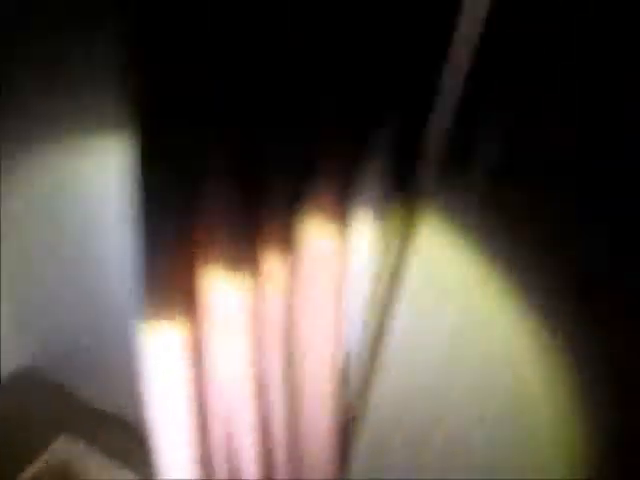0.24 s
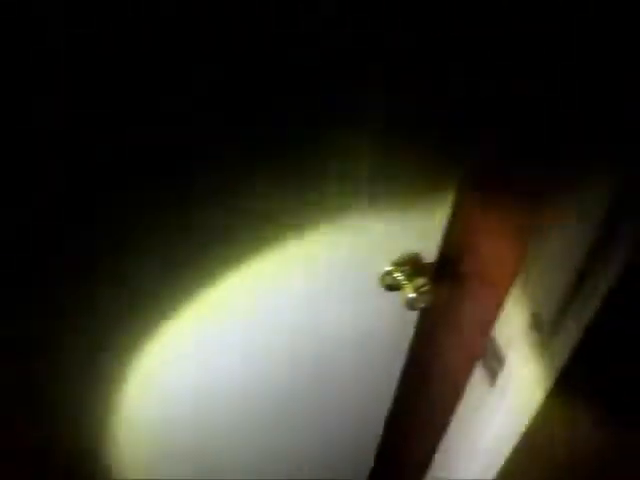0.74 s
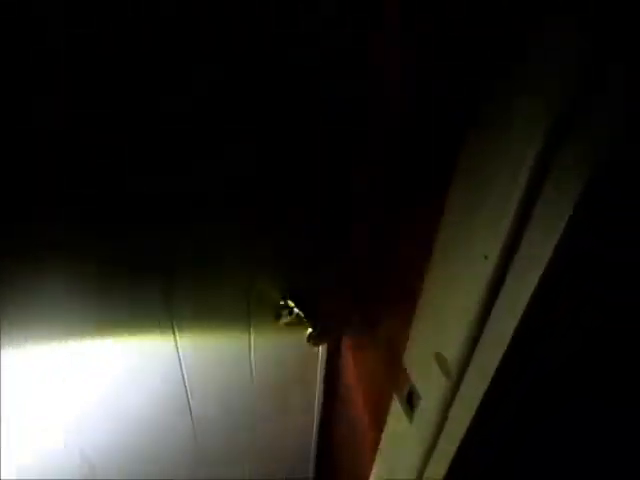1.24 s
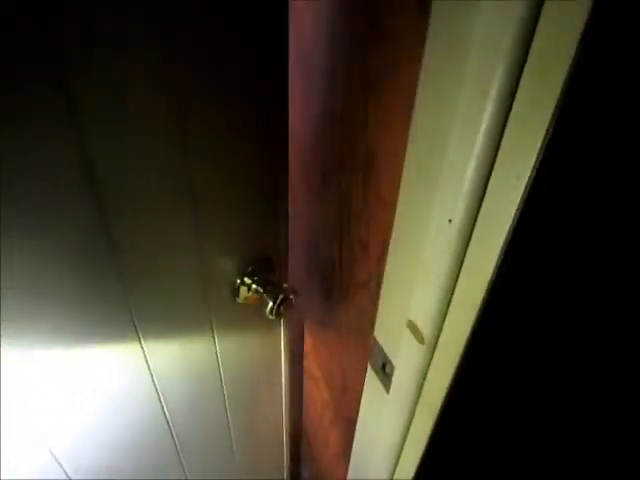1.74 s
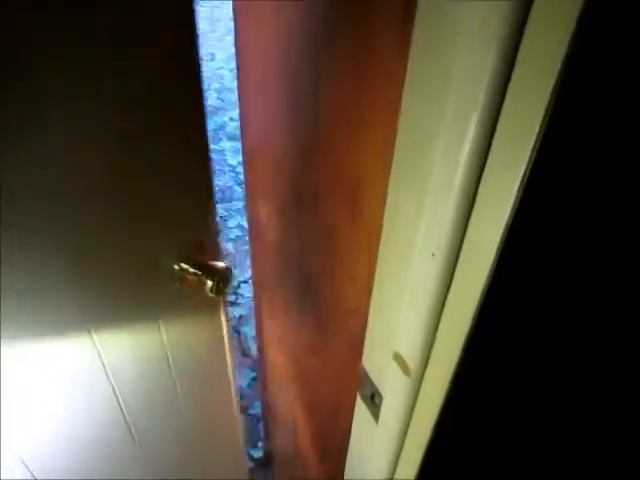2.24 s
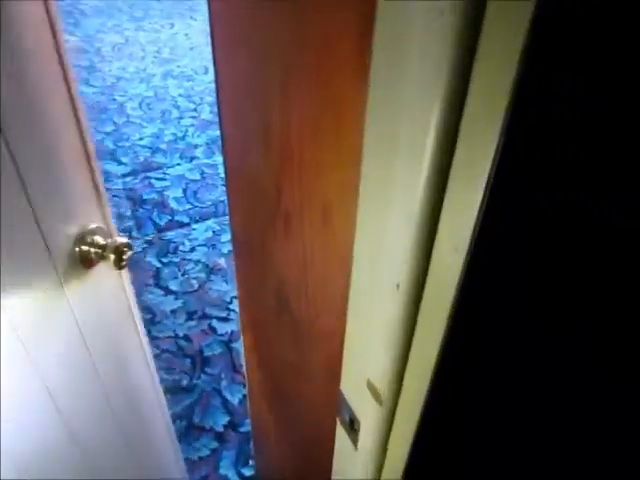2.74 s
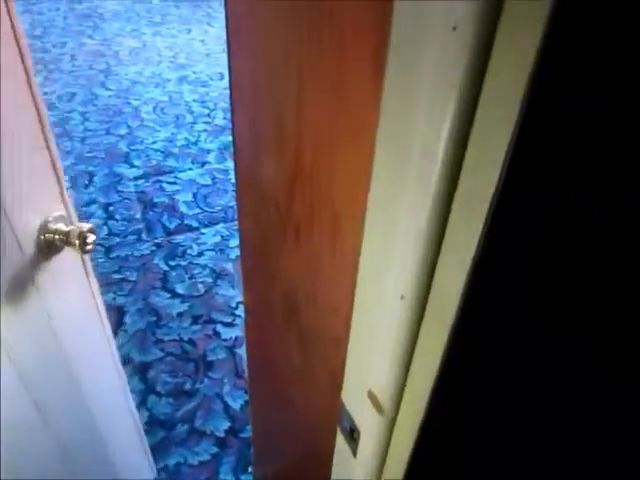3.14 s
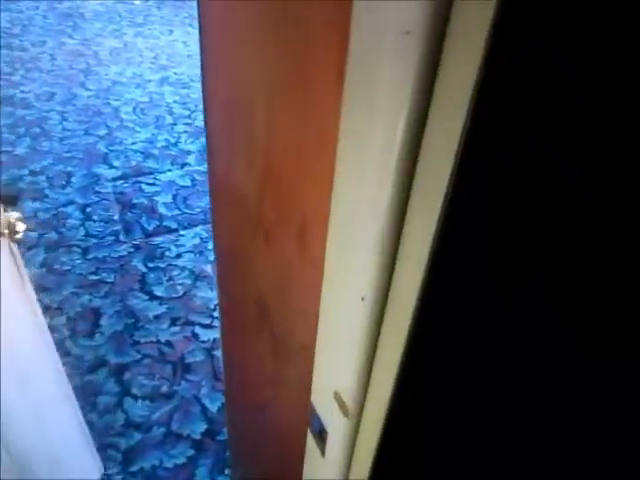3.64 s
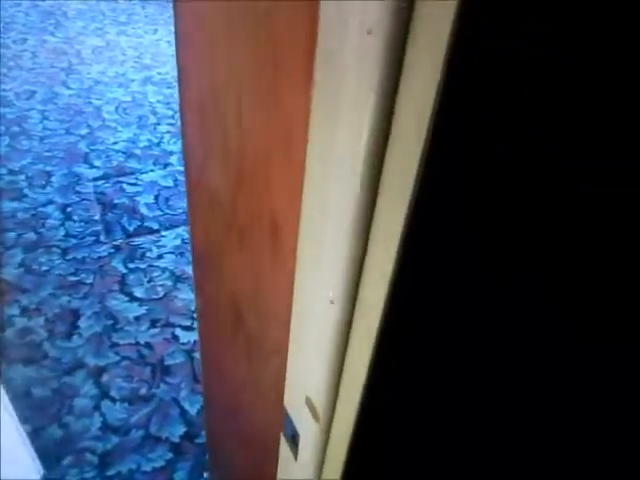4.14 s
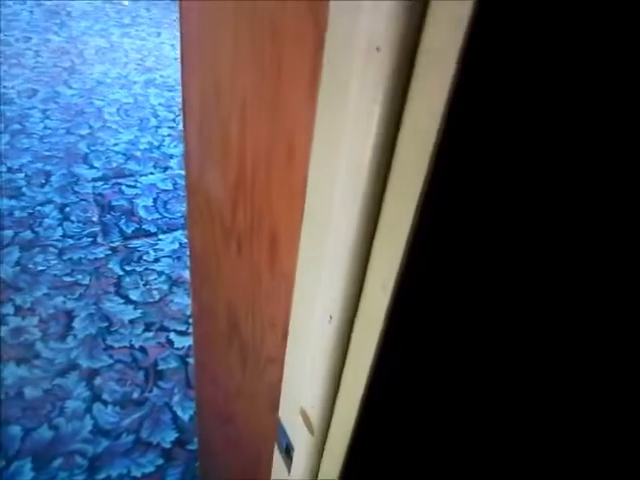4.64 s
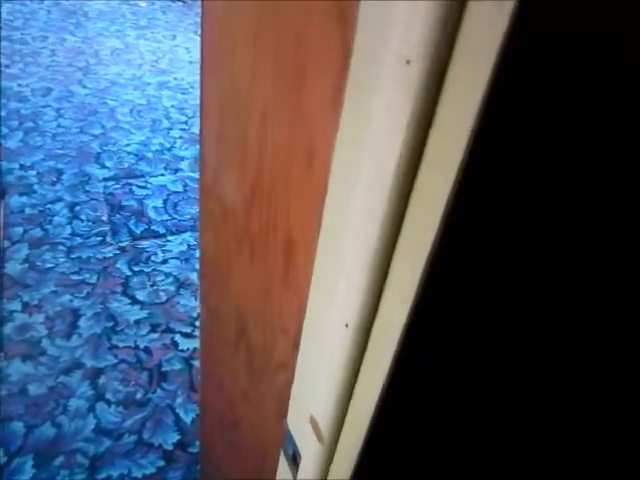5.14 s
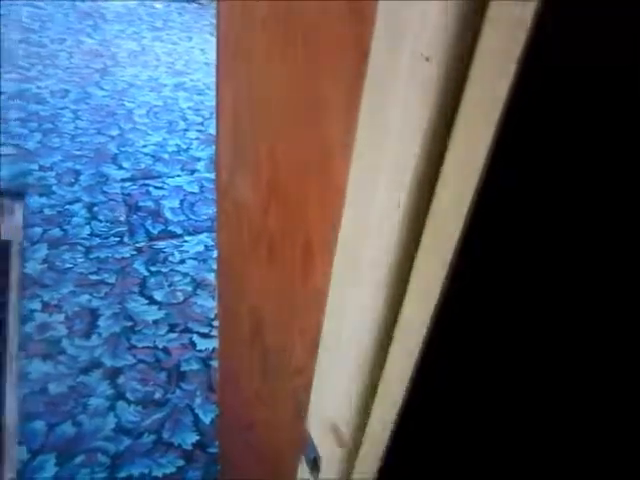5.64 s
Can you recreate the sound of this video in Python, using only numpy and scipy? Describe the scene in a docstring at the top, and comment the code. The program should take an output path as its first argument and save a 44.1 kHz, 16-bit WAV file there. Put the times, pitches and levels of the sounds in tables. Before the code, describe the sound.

Close, slightly hissy handheld sound indoors: carpet drag and cloth rustle first, then dull footfalls with gritty scuffs and board clicks. The middle is calmer, with faint dragging and a deep hum gradually rising. One hollow door knock comes past the middle, then light thuds and sharp ticks, and finally a much louder woody bang with latch clack, short room echo and bumps on the camera.

```python
"""A faint hiss and the drag of a door over carpet open the scene, as someone with a camera pushes the door.
Shaped noise makes the hiss, the dragging, the rustling clothes, the bang's deep boom and hand rumble.
Fading tones and noise bursts make the thudding feet and the small clicks; gritty noise makes the scuffs.
A hollow wooden knock and then a hard bang ring through the room, as quick contacts excite the wood.
A low drone grows meanwhile, and the camera's gain control turns down loud peaks."""
import sys
import numpy as np
from scipy import signal
from scipy.fft import rfft, irfft, next_fast_len
from scipy.io import wavfile
from scipy.ndimage import uniform_filter1d, minimum_filter1d, map_coordinates

SR = 44100
rng = np.random.default_rng(int(sys.argv[2]) if len(sys.argv) > 2 else 0)


def wrap_up_sound(samples):
    """Save the sound to the file named by the first command line argument, as 16-bit audio."""
    columns = np.atleast_2d(samples).T
    # keep every value between -1 and 1, then stretch to whole-number steps
    tamed = np.clip(columns, -1, 1)
    steps = np.round(tamed * 32767).astype(np.int16)
    wavfile.write(sys.argv[1], SR, steps)


N = 259749  # length in samples


def amp(db):
    """Turn decibels into a gain."""
    return 10 ** (np.asarray(db) / 20)


def unit(x):
    """Scale a signal to an average (rms) level of 1."""
    return x / np.sqrt(np.mean(x ** 2) + 1e-20)


def along(points, hz):
    """Read a curve of (Hz, value) points on a logarithmic frequency axis."""
    point_hz, values = np.transpose(points)
    return np.interp(np.log(hz + 1), np.log(point_hz + 1), values)


def wobble(rate):
    """A smooth random curve through `rate` random points a second."""
    points = rng.standard_normal(int(N * rate / SR) + 4)
    return map_coordinates(points, [np.arange(N) * rate / SR])


def colour(x, gain):
    """Filter a sound by a gain that depends on frequency, with no echo ahead of the sound."""
    m = 2 * next_fast_len(len(x))
    wanted = np.maximum(gain(np.fft.rfftfreq(m, 1 / SR)), 1e-6)
    # folding the cepstrum (the spectrum of the log gain) makes the filter act only forward in time
    cepstrum = irfft(np.log(wanted))
    cepstrum[1:m // 2] *= 2
    cepstrum[m // 2 + 1:] = 0
    return irfft(rfft(x, m) * np.exp(rfft(cepstrum)))[:len(x)]


def noise(spectrum):
    """Steady noise of rms 1, shaped by (Hz, dB) points."""
    m = next_fast_len(N)
    gain = amp(along(spectrum, np.fft.rfftfreq(m, 1 / SR)))
    return unit(irfft(rfft(rng.standard_normal(m)) * gain, m)[:N])


def fade(t, t60):
    """Exponential decay that loses 60 dB in t60 seconds."""
    return np.exp(-np.log(1000) * t / t60)


def stroke(start, length, rise, t60):
    """Loudness curve that builds up, holds, then dies away."""
    t = np.arange(N) / SR - start
    return np.clip(t / rise, 0, 1) * fade(np.maximum(t - length, 0), t60)


def swells(rows):
    """Loudness curve of smooth movements, from rows of (peak s, dB, half-length s)."""
    t = np.arange(N) / SR
    return np.sqrt(sum(np.square(amp(db) * np.exp(-np.square((t - s) / half))) for s, db, half in rows))


def add(track, s, sound):
    """Mix a sound into the track from s seconds on."""
    part = track[round(s * SR):][:len(sound)]
    part += sound[:len(part)]


def in_room(x, wet_db):
    """Add the answer of the walls: fading noise in which each pitch range has its own decay."""
    # Each row: frequency in Hz, strength of the room's answer in dB.
    walls = [(100, 0), (400, 2), (1200, -5), (3000, -3.5), (5000, -6.5), (8000, -6), (14000, 6.5)]
    # Each row: frequency in Hz, time to fade by 60 dB in seconds.
    decays = [(80, 0.53), (350, 0.37), (1000, 0.46), (2000, 0.38), (4000, 0.37), (7000, 0.34),
              (14000, 0.12)]
    hz, t, z = signal.stft(rng.standard_normal(len(x)), SR, nperseg=256)
    z = z * amp(along(walls, hz))[:, None] * fade(t, along(decays, hz)[:, None])
    tail = signal.istft(z, SR, nperseg=256)[1]
    tail = np.pad(tail / np.linalg.norm(tail), (round(.005 * SR), 0))  # the answer starts 5 ms late
    return x + amp(wet_db) * signal.fftconvolve(x, tail)[:len(x)]


def background():
    """Room tone and hiss, faint whines, and the next room's drone that grows as the door opens."""
    # Shape of the room tone and hiss. Each row: frequency in Hz, relative level in dB.
    floor = [(15, -54), (25, -2), (64, -7.5), (102, -4.5), (148, -15.5), (174, -10), (276, -12),
             (414, -17.5), (834, -19.5), (929, -20.5), (1220, -20.5), (2090, -24.5), (2520, -26.5),
             (9460, -32), (15800, -41)]
    # Tones of the drone. Each row: pitch in Hz, relative level in dB.
    hum = [(97, -68), (119, -65)]
    # Faint whines in the microphone hiss. Each row: centre in Hz, level in dB.
    whines = [(7950, -81), (9550, -77.5), (13050, -83)]
    whine_width_hz = 140
    drone_shut_db, drone_open_db, door_open_s = -11.5, 9.5, 4.0
    t = np.arange(N) / SR
    drone = 0
    for hz, db in hum:
        level = amp(db + 4.4 * wobble(3.046))  # loudness and phase both waver
        drone = drone + level * np.sin(2 * np.pi * hz * t + 0.45 * wobble(26))
    drone_db = np.interp(t, [0, door_open_s], [drone_shut_db, drone_open_db])
    whine = 0
    for hz, db in whines:
        whine = whine + amp(db) * unit(wobble(2 * whine_width_hz) * np.sin(2 * np.pi * hz * t))
    return amp(-53) * noise(floor) + amp(drone_db) * drone + whine


def drag(rough_db):
    """With each push the carpet pile catches unevenly on the door's edge and the hollow leaf hums."""
    # Each row: start in seconds, length in seconds, level in dB, time to coast down by 60 dB in seconds.
    pushes = [(-.04, 0.083, -45.5, 1.5), (0.512, 0.55, -45, 0.44), (1.197, 0.4, -54, 1.4),
              (1.633, 0.14, -52, 2), (2.357, 0.35, -49.5, 2.4), (3.317, 0.49, -59, 3.7),
              (4.435, 0.17, -49, 5.1), (5.317, .36, -47.5, 2.4)]
    # Shape of the rubbing sound. Each row: frequency in Hz, relative level in dB.
    rub = [(60, -24), (200, -34), (290, -10), (345, 2), (390, 1), (450, -5), (540, -10.5), (700, -17),
           (1000, -13.5), (1200, -21.5), (1450, -18.5), (1800, -21.5), (2250, -21.5), (3000, -31),
           (8000, -43), (16000, -66)]
    push_rise_s = 0.038  # time for the door to get moving
    speed = np.max([amp(db) * stroke(s, length, push_rise_s, t60) for s, length, db, t60 in pushes], axis=0)
    return speed * unit(noise(rub) * amp(rough_db * wobble(70)))


def clothes(grain_db):
    """Cloth rustles and a sleeve swishes: noise with a fine grain that swells with each movement."""
    # Body movements. Each row: time of the peak in seconds, level in dB, half-length in seconds.
    rustles = [(.03, -56.5, 0.31), (.83, -53.5, 0.53), (1.3, -61, 0.062), (1.54, -54, 0.15),
               (1.76, -54, 0.099), (2.63, -60, 0.1), (5.65, -63, 0.074)]
    # Airy sleeve movements. Each row: time of the peak in seconds, level in dB, half-length in seconds.
    swishes = [(1.027, -60, 0.19), (1.463, -48, 0.02), (1.565, -53, 0.037), (2.618, -70, .05),
               (3.078, -62.5, .06), (4.635, -55.5, 0.033)]
    # Shape of the rustle. Each row: frequency in Hz, relative level in dB.
    cloth = [(200, 9.5), (1000, -12), (3000, 1), (6000, 0.5), (11000, -4), (14000, -9), (16000, -26)]
    airy = [(500, -9), (3000, -12), (7000, -1), (12000, 1), (14500, -8), (16000, -7)]  # (Hz, dB)
    grain = amp(grain_db * wobble(250))
    rustling = swells(rustles) * unit(noise(cloth) * grain)
    swishing = swells(swishes) * unit(noise(airy) * grain)
    return rustling + swishing


def clicks(sharpness, wet_db):
    """Boards and fittings click: small hard contacts, each a noise burst in one broad resonance."""
    # Each row: start in seconds, level in dB, centre in Hz, time to fade by 60 dB in seconds.
    contacts = [(.149, -52, 4500, 0.043), (.5335, -40, 2400, 0.02), (.746, -43.5, 7400, 0.04),
                (1.3095, -42.5, 1540, 0.052), (1.317, -46.5, 6000, 0.036), (1.7235, -36, 1620, 0.1),
                (1.7275, -32.5, 4280, 0.031), (2.66, -54, 5000, .04), (2.943, -52, 1360, .04),
                (4.2395, -50, 4430, .04), (4.3585, -44.5, 1370, 0.068), (4.359, -50.5, 5400, .04),
                (4.5195, -30.5, 2380, 0.02), (4.5225, -30.5, 3840, 0.016), (5.175, -38, 7000, 0.069),
                (5.203, -44, 7500, 0.17), (5.457, -52, 2770, 0.052), (5.507, -56, 2800, .05),
                (5.652, -43.5, 3420, 0.062)]
    t, out = np.arange(SR // 2) / SR, np.zeros(N)
    for s, db, hz, t60 in contacts:
        def band(f):
            detune = sharpness * (f / hz - hz / (f + 1))
            return 1 / (1 + detune ** 4) + 0.025

        # drop the first samples, where the filter is still filling up
        burst = unit(colour(rng.standard_normal(len(t) + 512), band))[512:]
        add(out, s, in_room(amp(db) * burst * fade(t, t60), wet_db))
    return out


def footsteps(tread_db, wet_db):
    """A soft sole thuds and sets the floorboard under it swinging."""
    # Each row: start in seconds, level in dB, board pitch in Hz, time for the board to fade by 60 dB in seconds.
    steps = [(.578, -31, 227, 0.077), (1.3088, -26, 210, 0.097), (1.316, -33.5, 121.4, 0.26),
             (1.7234, -25, 200, 0.16), (2.943, -39, 280, 0.043), (4.359, -32, 347, 0.038),
             (4.368, -28.5, 400, 0.039), (4.3798, -33.5, 98, 0.6), (4.452, -30, 362, 0.065),
             (5.686, -35, 358, 0.064)]
    t, out = np.arange(SR // 2) / SR, np.zeros(N)
    sole = noise([(40, -19), (120, -3), (330, -3.5), (550, -12.5), (1000, -21.5), (3000, -41), (10000, -50)])
    onset = 1 - np.exp(-t / 0.00096)
    for s, db, hz, t60 in steps:
        board = np.sin(2 * np.pi * hz * t) * fade(t, t60)
        tread = amp(tread_db) * np.roll(sole, -round(s * SR))[:len(t)] * fade(t, 0.23)
        add(out, s, in_room(amp(db) * (board + tread) * onset, wet_db))
    return out


def scuffs(grain_db):
    """Soles and trouser legs slide in short strokes of gritty noise."""
    # Each row: time of the peak in seconds, level in dB, rise in seconds,
    # time to fade by 60 dB in seconds, boost of the body below about 1 kHz in dB.
    slides = [(1.215, -41, 0.007, 0.3, -17), (1.242, -39, 0.0071, 0.14, -14), (1.262, -46.5, .012, 0.24, 5),
              (1.441, -44.5, 0.0015, 0.16, 12.5), (1.484, -59, 0.019, 0.18, 26.5)]
    # Shape of the sliding hiss. Each row: frequency in Hz, relative level in dB.
    sole = [(150, -2), (550, 4.5), (900, 3), (1400, 3), (2200, 0), (4200, 1), (7000, -3.5), (11000, -7),
            (16000, -20)]
    t, out = np.arange(SR // 2) / SR - .05, np.zeros(N)  # time 0 is the peak
    hiss = unit(noise(sole) * amp(grain_db * wobble(350)))
    for s, db, rise, t60, body_db in slides:
        slide = np.exp(np.minimum(t, 0) / rise) * fade(np.maximum(t, 0), t60)
        grain = colour(hiss[round(s * SR):][:len(t)], lambda hz: amp(body_db / (1 + (hz / 1000) ** 2)))
        add(out, s + t[0], amp(db) * slide * grain)
    return out


def knock(blows, spectrum, modes, ring_db, chatter_db, chatter_t60, chatter_hz, wet_db):
    """Wood meets wood in a few quick contacts; the panel chatters briefly and its own tones ring on."""
    t, out = np.arange(SR // 2) / SR, np.zeros(N)
    for s, db, hard_hz in blows:
        # one clean push for the bass, a spray of tiny after-contacts for the treble
        spray = rng.standard_normal(len(t)) * fade(t, chatter_t60)
        push = amp(chatter_db) * colour(spray, lambda hz: hz / np.hypot(hz, chatter_hz))
        push[0] = 1
        # softer contacts give the wood less treble
        thud = colour(push, lambda hz: amp(along(spectrum, hz)) / np.hypot(1, (hz / hard_hz) ** 2))
        add(out, s, amp(db) * in_room(thud, wet_db))
    # the strongest contact sets the panel ringing
    s, db, _ = max(blows, key=lambda row: row[1])
    ring = 0
    for hz, level, t60 in modes:
        ring = ring + amp(level) * fade(t, t60) * np.sin(2 * np.pi * (hz * t + rng.random()))
    add(out, s, amp(db + ring_db) * ring * (1 - np.exp(-t / 0.0014)))
    return out


def hollow_knock():
    """A hollow knock on the door leaf: quick contacts, a fairly long chatter and ringing tones."""
    # Contacts. Each row: start in seconds, relative level in dB, hardness in Hz (higher is brighter).
    leaf_blows = [(3.7374, 4.5, 6000), (3.7400, 3.5, 14000), (3.7422, 13.5, 12000)]
    # Shape of the thud. Each row: frequency in Hz, relative level in dB.
    leaf = [(40, -29), (110, -24), (220, -18.5), (305, -1), (400, 1), (560, -9), (660, -7), (790, -15.5),
            (1000, -8.5), (1350, -19.5), (1680, -12), (2500, -25), (4300, -32), (7500, -27.5), (11000, -32),
            (15000, -49)]
    # Ringing tones. Each row: pitch in Hz, relative level in dB, time to fade by 60 dB in seconds.
    leaf_modes = [(276.6, -9, 0.3), (319.4, 3.5, 0.23), (396, -17, .16), (445, 8, 0.18), (648, -7, 0.3),
                  (847, -14.5, 0.48), (920, -2, 0.2), (1700, -2, 0.11)]
    return amp(16) * knock(leaf_blows, leaf, leaf_modes, ring_db=-58.5, chatter_db=-25.5,
                           chatter_t60=0.079, chatter_hz=2010, wet_db=-8.5)


def hard_bang():
    """The door bangs in a tight run of contacts with short chatter and many ringing tones."""
    # Contacts. Each row: start in seconds, relative level in dB, hardness in Hz (higher is brighter).
    bang_blows = [(5.1485, 5, 6000), (5.1505, 15, 3040), (5.153, 9, 9000), (5.1553, 5, 5000),
                  (5.1601, 20.5, 7100), (5.1619, 19, 2970), (5.167, 16.5, 1600)]
    # Shape of the thud. Each row: frequency in Hz, relative level in dB.
    bang = [(30, -25), (90, 5), (150, 2.5), (220, 3.5), (330, 1.5), (480, -8.5), (630, 1.5), (800, -3.5),
            (1100, -2), (1700, -4), (2300, -8), (3200, -14.5), (5000, -13), (8000, -23.5), (15000, -38)]
    # Ringing tones. Each row: pitch in Hz, relative level in dB, time to fade by 60 dB in seconds.
    bang_modes = [(69.4, -4.5, 0.53), (127, -1.5, 0.36), (199.5, 7.5, 0.17), (256, 3.5, 0.32),
                  (317, 5, 0.34), (355.5, 4.5, 0.29), (403, 1, 0.23), (448, -2, 0.27), (638, 5, 0.19),
                  (1020, -2, 0.33), (1204, 6, 0.14), (1250, -9, 0.14), (1500, -6, 0.14), (1870, 1.5, 0.15),
                  (2246, -8, 0.18)]
    return amp(8.0) * knock(bang_blows, bang, bang_modes, ring_db=-48.5, chatter_db=-18.0,
                            chatter_t60=0.019, chatter_hz=2010, wet_db=-4.5)


def latch(wet_db):
    """The latch and stiff parts at the door's edge clack with the bang: tones that die almost at once."""
    # Each row: start in seconds, level in dB, pitch in Hz, time to fade by 60 dB in seconds.
    clacks = [(5.1488, -8, 1870, 0.017), (5.1495, -9, 4860, 0.0079), (5.1602, 2, 1203, 0.02),
              (5.1598, -4, 3370, 0.011), (5.1607, -4.5, 2200, 0.019)]
    t, out = np.arange(SR // 2) / SR, np.zeros(N)
    for s, db, hz, t60 in clacks:
        add(out, s, in_room(amp(db) * np.sin(2 * np.pi * hz * t) * fade(t, t60), wet_db))
    return out


def low_rumbles():
    """Low noise that starts fast and dies away: first the bang's deep boom, then hands jolting the camera."""
    # The first row is the boom, the others are the hands.
    # Each row: start in seconds, level in dB, time to fade by 60 dB in seconds.
    rumbles = [(5.17, -34, 1.32), (5.595, -35.5, 0.38), (5.73, -43.5, .6), (5.81, -39.5, 0.5)]
    rise_s, hold_s = .02, 0.025
    loudness = sum(amp(db) * stroke(s, hold_s, rise_s, t60) for s, db, t60 in rumbles)
    return loudness * noise([(15, -5.5), (40, -7.5), (75, -6.5), (130, -23.5), (400, -36.5), (2000, -87)])


def scene():
    """Everything that reaches the camera's one microphone."""
    door = drag(rough_db=1.0) + hollow_knock() + hard_bang() + latch(wet_db=-14)
    feet = footsteps(tread_db=-13, wet_db=-14) + scuffs(grain_db=1.5)
    small_clicks = clicks(sharpness=0.96, wet_db=-8.5)
    return (background() + door + clothes(grain_db=1.1) + small_clicks + feet + low_rumbles())[None]


def gain_control(x, threshold_db, release_db, attack):
    """Peaks over the threshold pull the gain down; it returns by release_db a second."""
    over = np.maximum(20 * np.log10(np.abs(x) + 1e-9) - threshold_db, 0)
    # a running maximum on a rising ramp holds each peak and lets it go at a steady rate
    ramp = release_db * np.arange(N) / SR
    cut = np.maximum.accumulate(over + ramp, axis=-1) - ramp
    # the gain follows with a lag of `attack` seconds
    pole = np.exp(-1 / (attack * SR))
    return x * amp(-signal.lfilter([1 - pole], [1, -pole], cut))


def record(dry):
    """The camera rides its gain, limits the last peaks and cuts the highest treble."""
    x = gain_control(dry, threshold_db=1.5, release_db=29.5, attack=0.01)
    safe_gain = minimum_filter1d(1 / np.maximum(np.abs(x), 1), size=41)
    x = x * uniform_filter1d(safe_gain, size=41)
    top_hz = 15850
    return signal.sosfilt(signal.ellip(12, .1, 70, top_hz, fs=SR, output="sos"), x)


dry = scene()
out = record(dry)
wrap_up_sound(out)
```